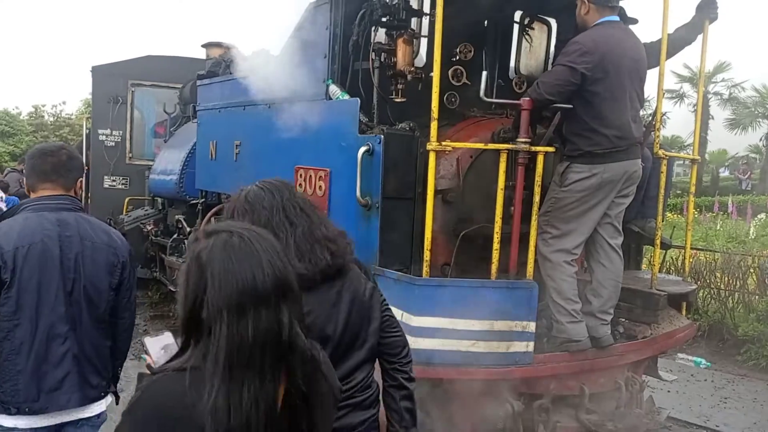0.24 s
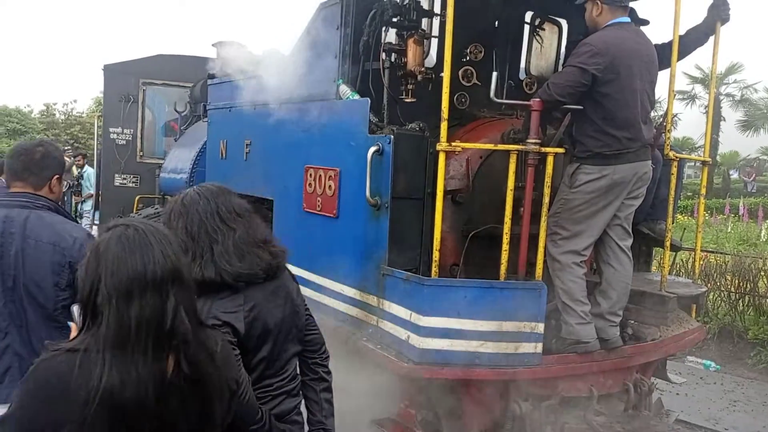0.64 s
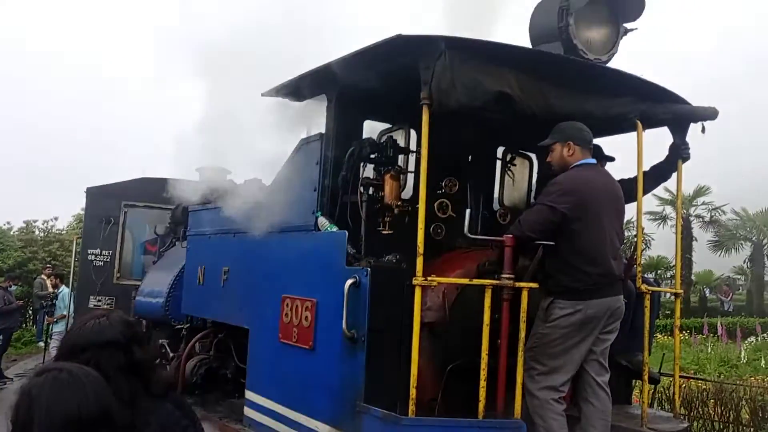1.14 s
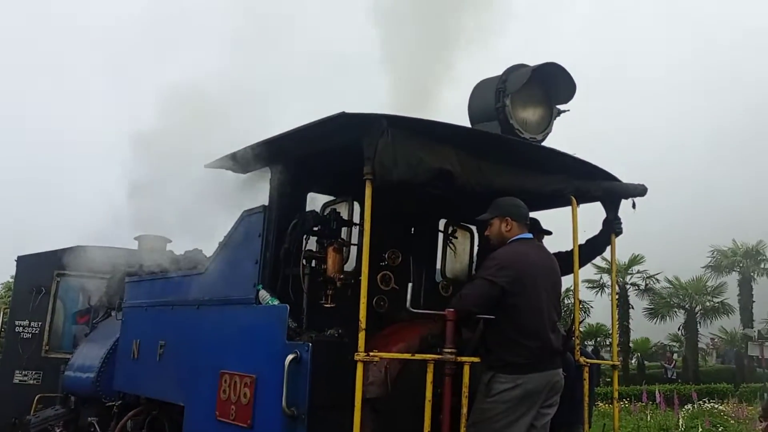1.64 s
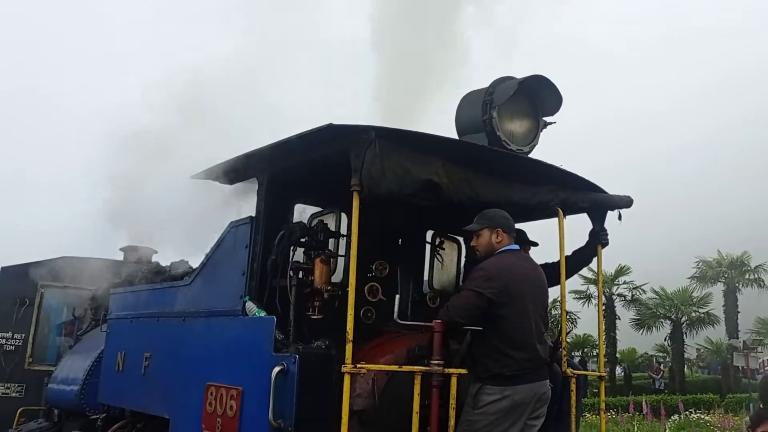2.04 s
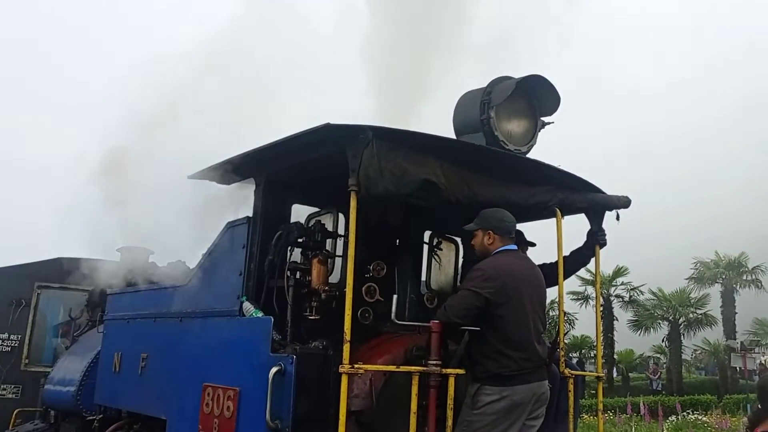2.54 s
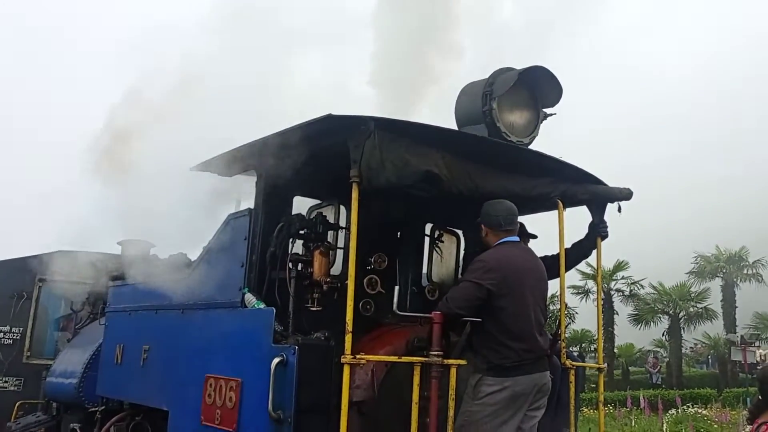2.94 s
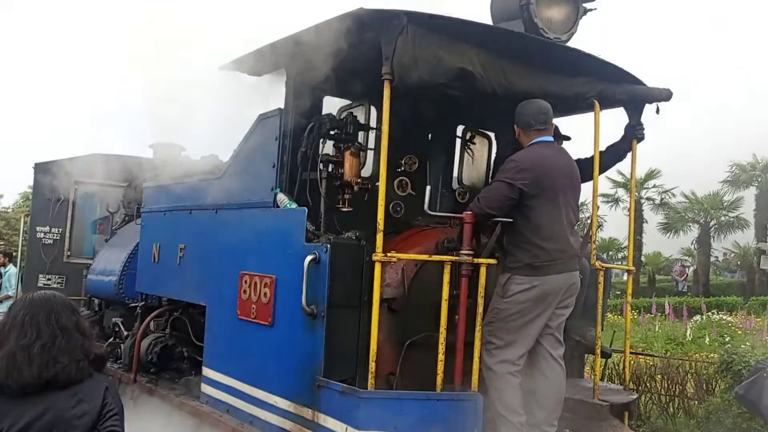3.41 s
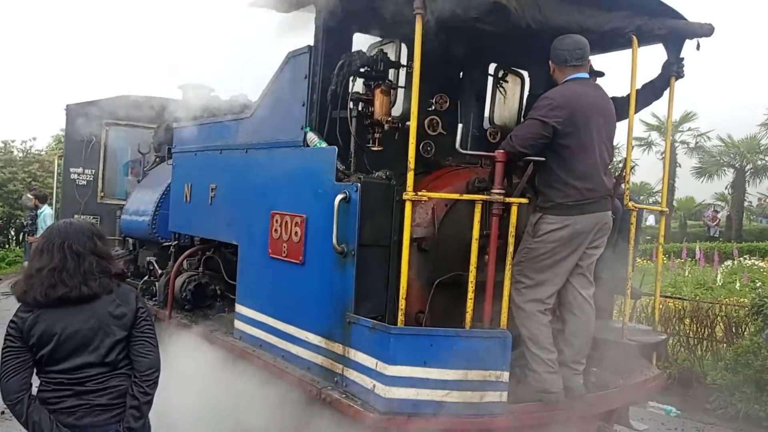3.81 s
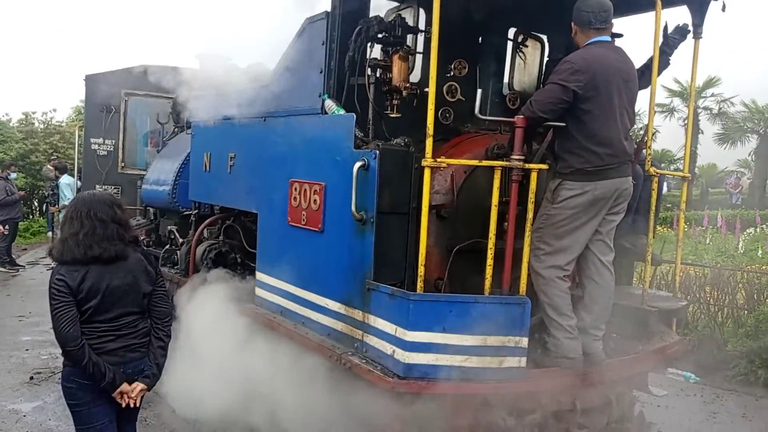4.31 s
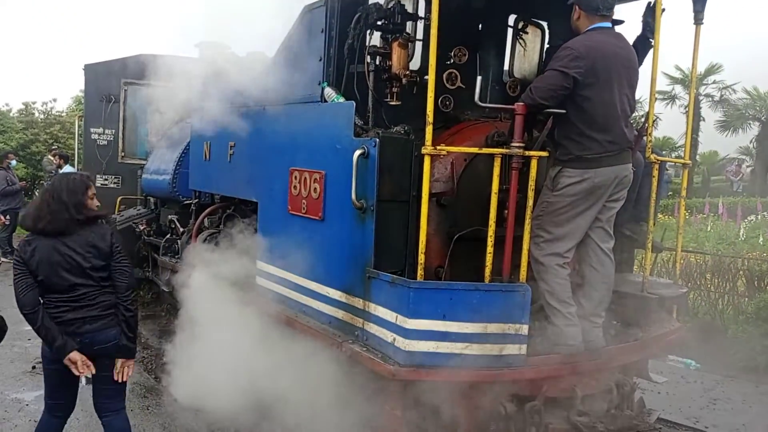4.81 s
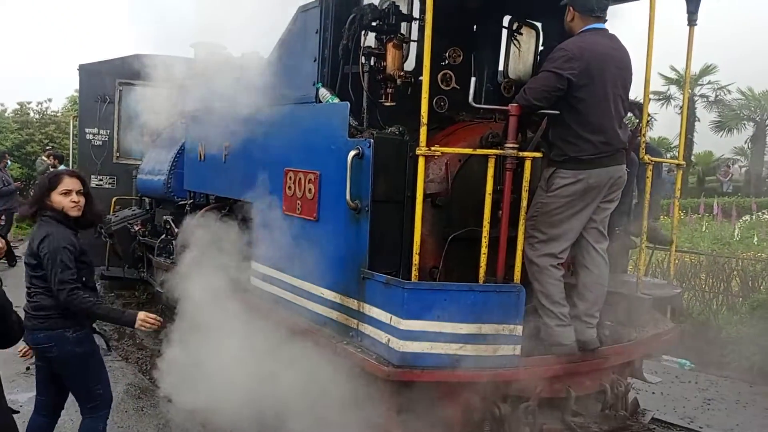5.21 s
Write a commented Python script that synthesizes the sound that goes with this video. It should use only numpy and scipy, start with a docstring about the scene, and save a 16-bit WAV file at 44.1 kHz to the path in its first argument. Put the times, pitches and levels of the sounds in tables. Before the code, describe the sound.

A small steam locomotive stands outdoors a few metres away, with a steady rush of escaping steam and a fine, high hiss from the start. Its whistle sputters faintly, with three quick bursts in the first quarter second and three more between about 0.5 and 0.9 seconds. At 0.9 seconds the note catches and swells, reaching full strength by about 1.5 seconds, far louder than the steam. It is one high, piercing tone of nearly constant pitch, with a slight flutter and breathy overtones that swell and fade. The note just overloads the microphone, and a soft low rumble rises with it. Around 3.5 seconds the whistle eases a little and the rumble recedes. The note dips briefly near 4.6 seconds, recovers, and is still sounding over the hissing steam at the end, around 5.5 seconds.

```python
"""Steam whistle at a station

A small standing locomotive holds one long note a few metres away. Steam blowing across the bell's lip
sputters at first, then sounds in full; the overtones swell and fade as the paths past the cab shift.
Turbulent jets add the rush of the cylinder drains, a hissing leak and fine spray.
The loud note just overloads the microphone, and a low rumble swells with it."""
import sys
import numpy as np
from scipy import signal
from scipy.fft import rfft, irfft
from scipy.io import wavfile

SR = 44100
rng = np.random.default_rng(int(sys.argv[2]) if len(sys.argv) > 2 else 0)


def int16_out(signal):
    """Quantize to a 16-bit WAV file."""
    q = np.round(np.clip(np.atleast_2d(signal).T, -1, 1) * 32767)
    wavfile.write(sys.argv[1], SR, q.astype(np.int16))


N = 240464

CATCH_S, BUILD_S = 0.9, 0.19  # onset of the full note; time constant of its growth


def whistle(note_db):
    """Mode locking: steam blows across the bell's lip and all partials follow one unsteady pitch."""
    # fundamental, creeping up as the bell warms: (time [s], frequency [Hz])
    pitch = [(0.0, 1069), (0.4, 1070.0), (0.95, 1072), (1.2, 1072), (1.95, 1073.0), (2.4, 1076.0),
             (2.6, 1075.0), (3.3, 1076.0), (4.15, 1079), (4.4, 1077), (4.6, 1074), (4.8, 1076),
             (5.45, 1078)]
    # partials 2 to 6 as they arrive past the cab: (time [s], level [dB])
    second = [(0.0, -39.5), (0.4, -38.0), (0.7, -32.5), (0.98, -36.5), (1.07, -48.5), (1.33, -36.5),
              (3.1, -37.5), (3.8, -47), (4.25, -42), (4.38, -57), (4.62, -36.5), (4.8, -40.5),
              (4.88, -46.5), (5.45, -43.5)]
    third = [(0.0, -39), (0.92, -33), (1.06, -44.0), (1.14, -31), (1.28, -39.5), (1.85, -31), (2.08, -35.5),
             (2.27, -30.5), (2.42, -38), (3.18, -46), (3.27, -34.5), (3.36, -44.5), (3.5, -31.5),
             (3.599, -39), (3.77, -32.5), (3.9, -37.5), (4.299, -33.0), (5.45, -36)]
    fourth = [(0.0, -52.5), (0.36, -53), (0.9, -36.5), (1.019, -45.5), (1.401, -50.5), (1.58, -43.5),
              (1.779, -53), (2.2, -51.5), (2.45, -40), (2.681, -54), (3.12, -42), (3.521, -40),
              (3.7, -49.5), (4.45, -41), (4.66, -51), (4.78, -40), (5.2, -41), (5.45, -47.5)]
    fifth = [(0.0, -52.5), (0.85, -49.5), (1.5, -57.0), (3.15, -53.5), (3.4, -46), (3.6, -51),
             (5.15, -52.5), (5.45, -65)]
    sixth = [(0.0, -55), (0.65, -57), (1.15, -65), (1.45, -49.5), (2.2, -53.5), (2.68, -45.5), (2.82, -53),
             (3.03, -47.5), (3.55, -54.5), (4.6, -60.5), (5.45, -47.5)]
    # faint top overtones: (harmonic number [-], level [dB])
    high_overtones = [(7, -60), (8, -69.5), (9, -73.5), (10, -74.5)]
    lift_db = 0.98  # added to partials 2 to 4
    hz = curve(pitch) + 0.78 * waver(top_hz=24.6)
    phase = 2 * np.pi * np.cumsum(hz) / SR
    flutter = undb(np.minimum(note_db.max() - note_db, 14))  # a weaker note flutters more
    tone = undb(note_db) * partial(phase, flicker=0.025 * flutter, rush=0.028)
    for k, table in enumerate((second, third, fourth), 2):
        db = curve(table)
        # scattered sound stays when the direct path fades, so a weak overtone turns rough
        fade = undb(np.mean(db) - db)
        late_phase = k * phase - np.pi / 2  # a quarter-cycle lag tilts the wave
        overtone = partial(late_phase, flicker=0.064 * k * np.sqrt(fade), rush=0.033 * k * fade)
        tone += undb(db + lift_db) * overtone
    # short waves are scattered most, so the top overtones twinkle on their own
    for k, db in [(5, curve(fifth)), (6, curve(sixth)), *high_overtones]:
        tone += undb(db + 0.98 * waver(top_hz=3.5)) * partial(k * phase, flicker=0.2, rush=0.21)
    return tone


def note_level():
    """Self-excited oscillation: the fundamental sputters, catches and saturates; its level in dB."""
    # bursts while the valve is only cracked open: (start [s], length [s], level before lift [dB])
    sputters = [(0.005, 0.034, -33.5), (0.066, 0.044, -31.5), (0.129, 0.1, -34.5), (0.486, 0.053, -35.5),
                (0.632, 0.14, -36.5), (0.78, 0.15, -38)]
    # the full note: (time [s], level before lift [dB])
    held = [(1.4, -13), (3.34, -13.5), (3.76, -16), (4.48, -16), (4.64, -18.5), (4.8, -16), (5.42, -16.5)]
    sputter_lift_db, held_lift_db = 1.5, 0.7
    rise_s, fall_s, catch_edge_s = 0.019, 0.028, 0.013
    t = np.arange(N) / SR
    sputtering = undb(-44.5)  # faint tone between the bursts
    for start, length, db in sputters:
        rise = ramp(start + rise_s / 2, rise_s / 2)
        fall = np.exp(-np.maximum(t - start - length + fall_s / 2, 0) / fall_s)
        sputtering = np.hypot(sputtering, undb(db + sputter_lift_db) * rise * fall)
    sounding_s = catch_edge_s * np.logaddexp(0, (t - CATCH_S) / catch_edge_s)
    build = 1 - np.exp(-sounding_s / BUILD_S)
    full_note = undb(curve(held) + held_lift_db)
    return 20 * np.log10(sputtering * (1 - build) + build * full_note)


def partial(phase, flicker, rush):
    """Random modulation: hot eddies make a tone twinkle, and the jet adds a narrow skirt of noise."""
    twinkle = flicker * (waver(top_hz=21.3) + 1j * waver(top_hz=22.0))
    skirt = rush * (waver(top_hz=55.5) + 1j * waver(top_hz=51.0))
    return np.sqrt(2) * np.real((1 + twinkle + skirt) * np.exp(1j * phase))


def steam_and_rumble(note_db):
    """Turbulent mixing noise from drains, leak and spray, over a low rumble that swells with the note."""
    # spectra of the drains, rumble, leak and spray: (frequency [Hz], relative density [dB])
    drain_spectrum = [(60, -44.5), (180, -18), (330, -14), (700, -9), (1000, -10), (1700, -5), (2900, -2),
                      (4200, -3.5), (4700, -8), (6600, -15.5), (8200, -23), (10700, -27), (14000, -35),
                      (16000, -34)]
    rumble_spectrum = [(20, -20.5), (55, -8.5), (110, -1), (200, 2.5), (320, -1.5), (600, -3.5),
                       (1300, -8.5), (2500, -15), (8000, -38)]
    leak_spectrum = [(150, -38), (350, -13), (800, -4), (1400, -1.5), (1750, -17.5), (3500, -7),
                     (4200, -4.5), (4700, -2), (5500, 0), (6500, -5.5), (8000, -18.5), (10000, -24),
                     (13500, -35)]
    spray_spectrum = [(3000, -36.5), (7000, 4.5), (8400, -4), (10000, -5), (12000, -10.5), (13700, -15.5),
                      (16000, -11)]
    # course of the drain rush and of the spray: (time [s], level before lift [dB])
    drain_level = [(0.6, -41), (1.1, -39), (1.6, -40.0), (1.8, -40), (2.4, -40), (2.65, -41), (2.85, -40.0),
                   (3.15, -42), (3.8, -39.5), (4.4, -40), (4.75, -39), (5.45, -40.5)]
    spray_level = [(0.0, -55), (0.9, -52), (1.3, -59.5), (2.4, -57), (3.6, -58.5), (3.92, -51.5),
                   (4.25, -57.5), (5.3, -49.5), (5.45, -52)]
    drain_lift_db, spray_lift_db = 6, 0.5
    supply_db = -3 * (1 - ramp(middle_s=0.5, half_s=0.066))  # the valve opens further
    spill = 1 - ramp(middle_s=0.97, half_s=0.13)  # extra steam escapes until the note catches
    drain_db = curve(drain_level) + drain_lift_db + supply_db - 1.5 * spill
    leak_db = -43.5 + 0.46 * supply_db + 8 * spill
    spray_db = curve(spray_level) + spray_lift_db
    # the rumble swells steeply with the loud note, as from an overloaded microphone
    rumble_floor_db = -69 + 6 * ramp(CATCH_S, BUILD_S)
    rumble_db = np.maximum(-49.5 + 3.3 * (note_db - note_db.max()), rumble_floor_db)
    peaks_db = spectral_peaks()
    drain = fluttering_noise(colour(drain_spectrum) + peaks_db, drain_db, depth_db=0.59, top_hz=10)
    rumble = fluttering_noise(colour(rumble_spectrum), rumble_db, depth_db=1.5, top_hz=12)
    leak = fluttering_noise(colour(leak_spectrum) + peaks_db, leak_db, depth_db=0.36, top_hz=22.5)
    spray = fluttering_noise(colour(spray_spectrum), spray_db, depth_db=0.4, top_hz=25)
    return drain + rumble + leak + spray


def fluttering_noise(spectrum_db, level_db, depth_db, top_hz):
    """Amplitude modulation: coloured noise whose level flutters at random."""
    return noise(spectrum_db) * undb(level_db + depth_db * waver(top_hz=top_hz))


def spectral_peaks():
    """Interference and resonance: a low ground-echo ripple and higher resonances, in dB at every bin."""
    # steady peaks colouring the steam's rush: (frequency [Hz], width [Hz], gain [dB])
    peaks = [(350, 70, 5), (490, 70, 4), (655, 70, 4), (815, 110, 6), (1080, 150, 7.5), (1400, 190, 6),
             (2020, 170, 3.5), (2270, 120, 5.5), (2730, 100, 4), (3030, 190, 4), (3280, 110, 4.5),
             (3480, 80, 2.5), (4100, 320, 4), (6600, 300, 3.5)]
    return sum(db * np.exp(-2 * ((bins() - hz) / width) ** 2) for hz, width, db in peaks)


def overload(x, ceiling_db, order):
    """Saturation flattens the crests: hiss on the note is chopped twice a cycle and spills into bass."""
    return x / (1 + np.abs(x / undb(ceiling_db)) ** order) ** (1 / order)


def noise(spectrum_db):
    """Spectral shaping of white noise, scaled to rms 1."""
    shaped = irfft(rfft(rng.standard_normal(N)) * undb(spectrum_db), N)
    return shaped / np.sqrt(np.mean(shaped ** 2))


def waver(top_hz):
    """Low-pass random motion of rms 1, mostly slower than top_hz."""
    return noise(-10 * np.log10(1 + (bins() / top_hz) ** 4))


def colour(points):
    """A spectral envelope in dB, interpolated over log frequency."""
    hz, db = np.transpose(points)
    return np.interp(np.log(bins()), np.log(hz), db)


def bins():
    """Frequencies of the full-length spectrum in Hz, held at 1 or above."""
    return np.maximum(np.arange(N // 2 + 1) * SR / N, 1)


def curve(points):
    """Linear interpolation of (time [s], value) points at every sample."""
    times, values = np.transpose(points)
    return np.interp(np.arange(N) / SR, times, values)


def ramp(middle_s, half_s):
    """A smooth step from 0 to 1."""
    return 0.5 + 0.5 * np.tanh((np.arange(N) / SR - middle_s) / half_s)


def undb(db):
    """Decibels to amplitude ratio."""
    return 10 ** (np.asarray(db) / 20)


def scene():
    """Superposition of whistle, steam and rumble in one channel."""
    note_db = note_level()
    return (whistle(note_db) + steam_and_rumble(note_db))[None]


def record(dry):
    """Saturation and port resonance in the microphone, then band limiting at both ends."""
    low_cut_hz, high_cut_hz = 70, 15720
    port_band_hz, ring_db = (14350, 16000), 9.5
    x = overload(dry, ceiling_db=-7, order=10)
    x = signal.sosfilt(signal.butter(2, low_cut_hz, "high", fs=SR, output="sos"), x)
    ring = signal.sosfiltfilt(signal.butter(2, port_band_hz, "band", fs=SR, output="sos"), x)
    lifted = x + undb(ring_db) * ring
    return signal.sosfilt(signal.ellip(12, 0.2, 80, high_cut_hz, fs=SR, output="sos"), lifted)


dry = scene()
out = record(dry)
int16_out(out)
```